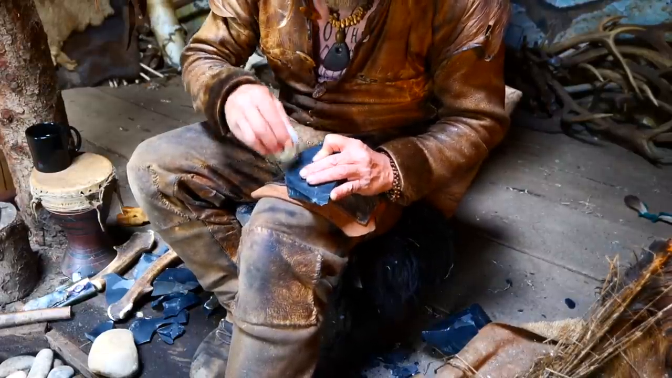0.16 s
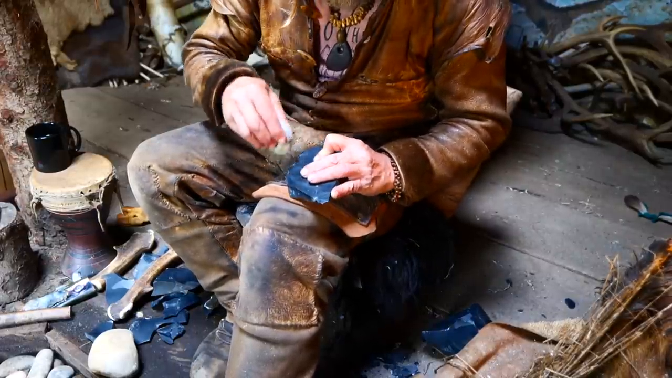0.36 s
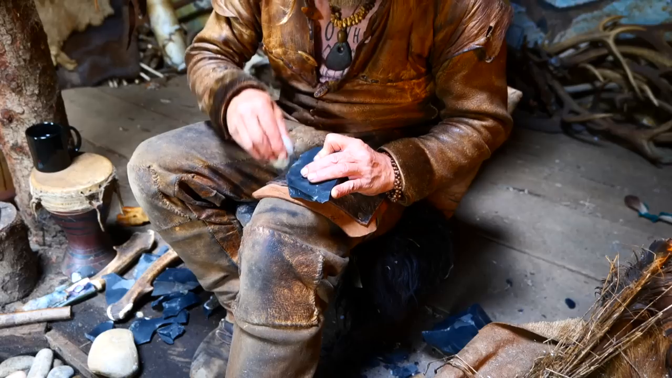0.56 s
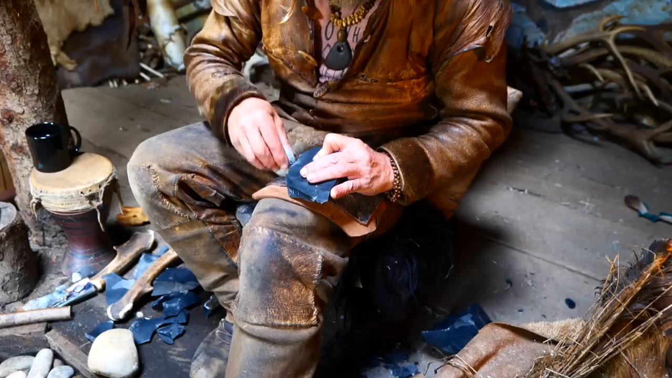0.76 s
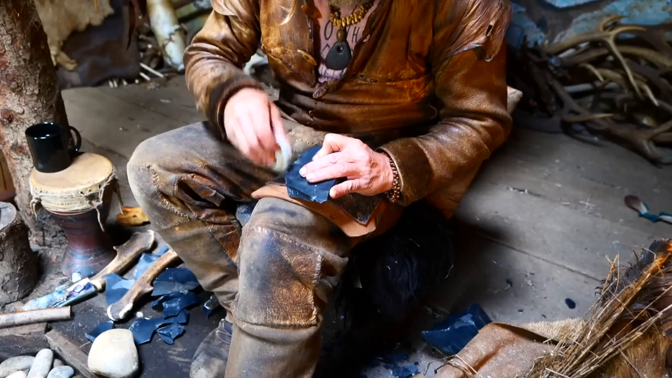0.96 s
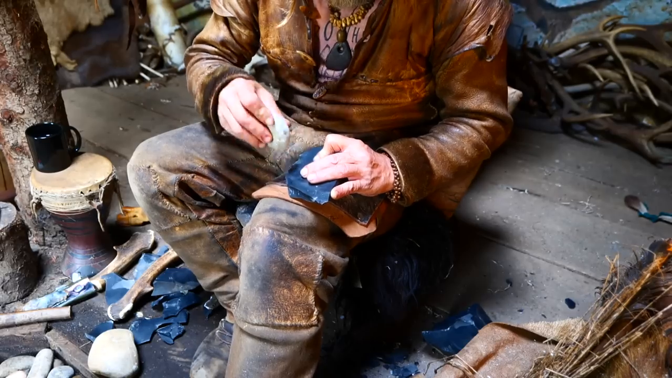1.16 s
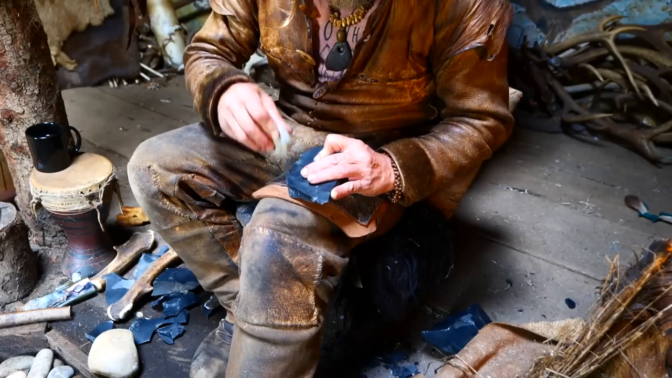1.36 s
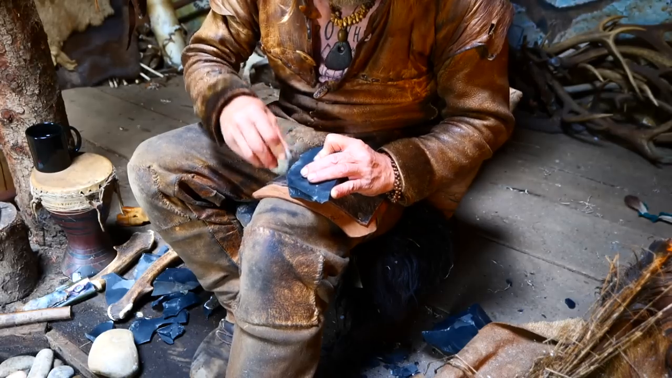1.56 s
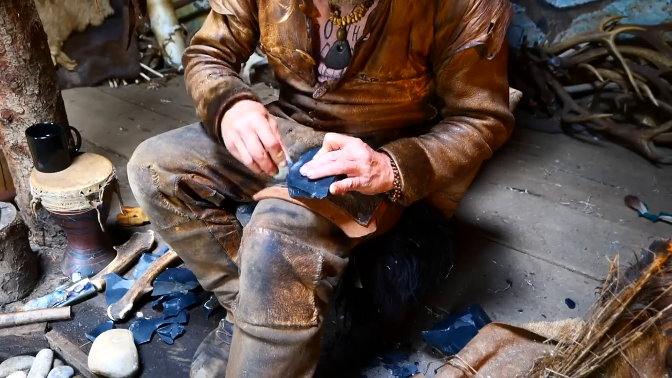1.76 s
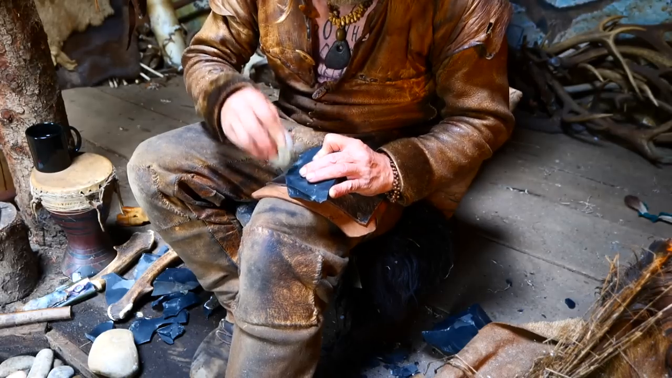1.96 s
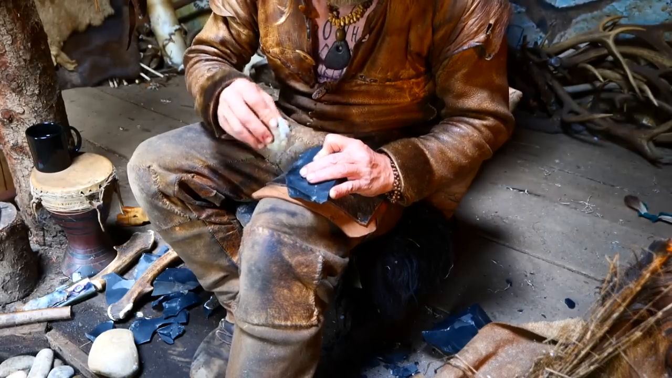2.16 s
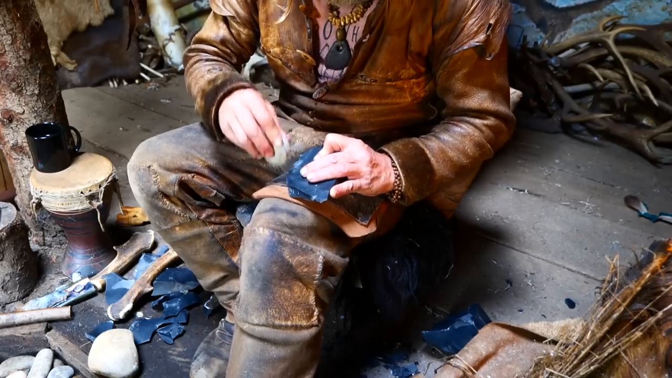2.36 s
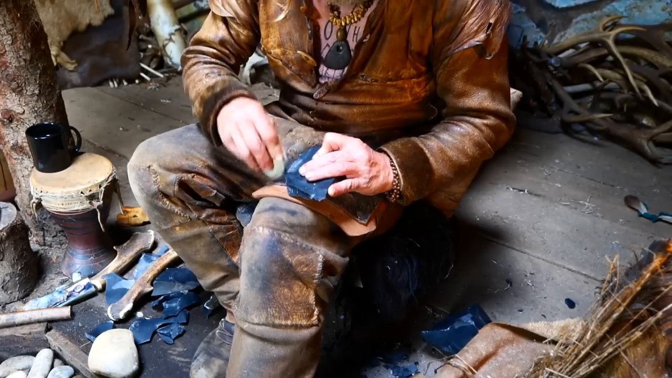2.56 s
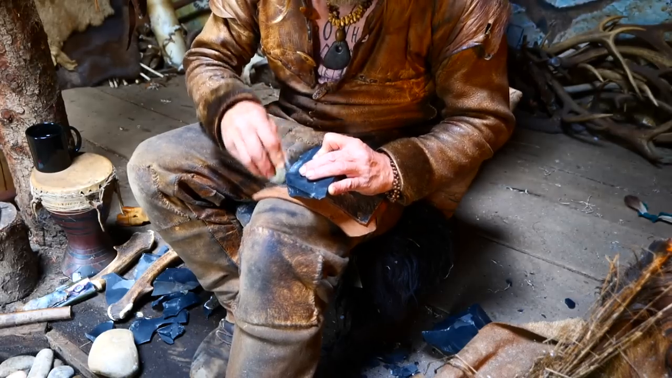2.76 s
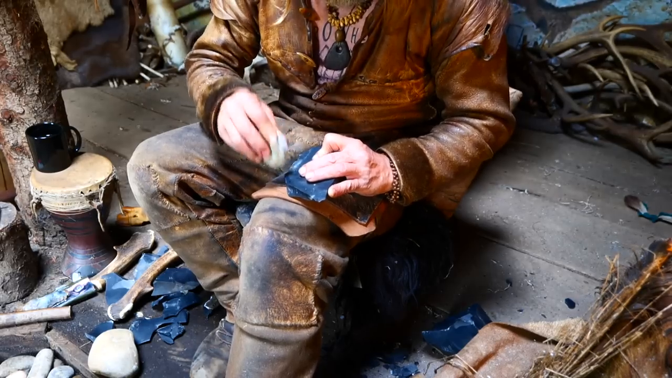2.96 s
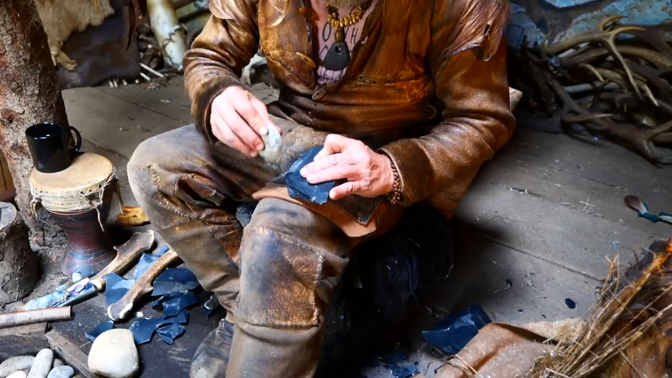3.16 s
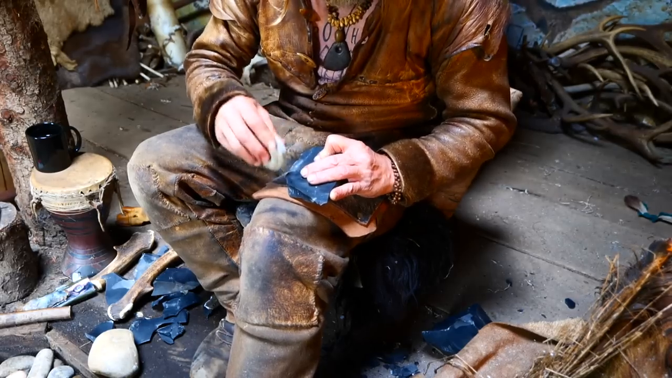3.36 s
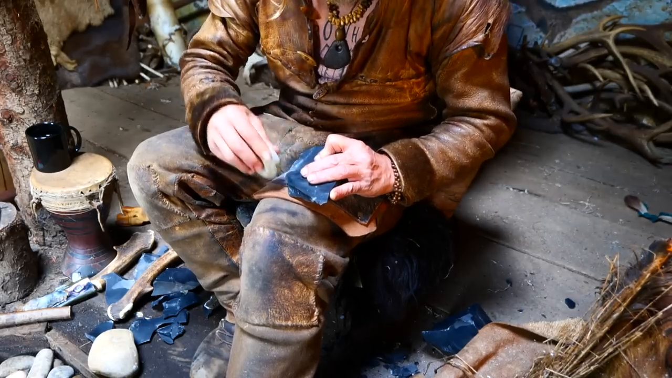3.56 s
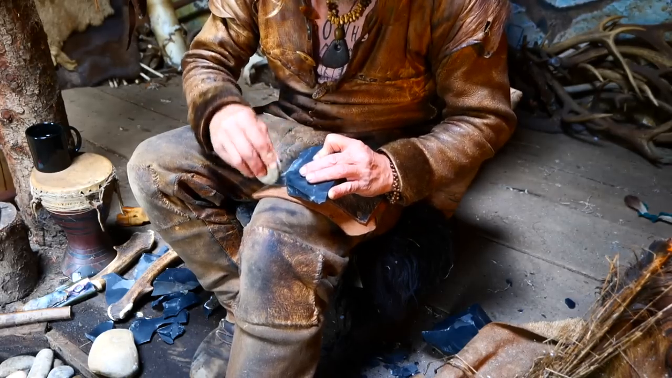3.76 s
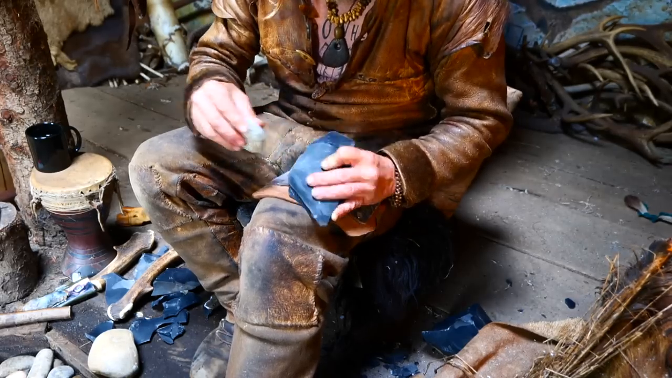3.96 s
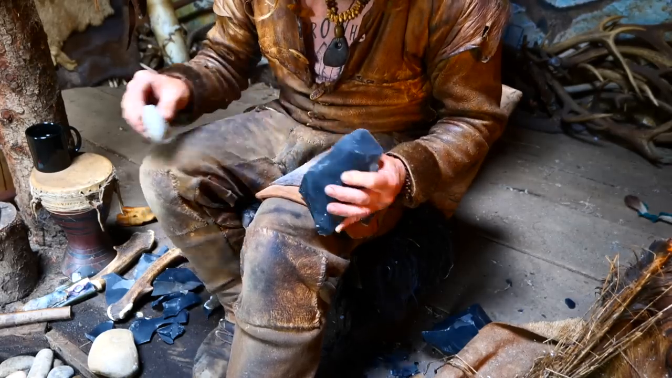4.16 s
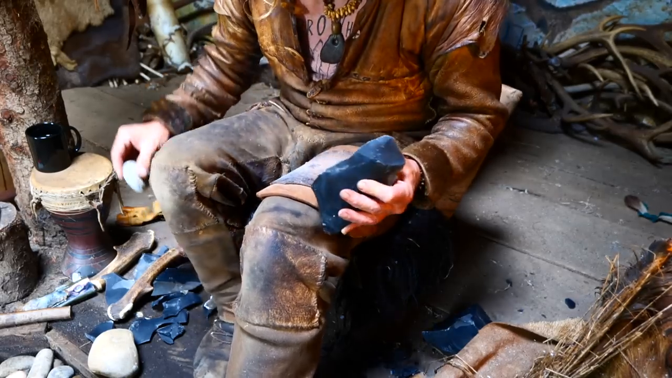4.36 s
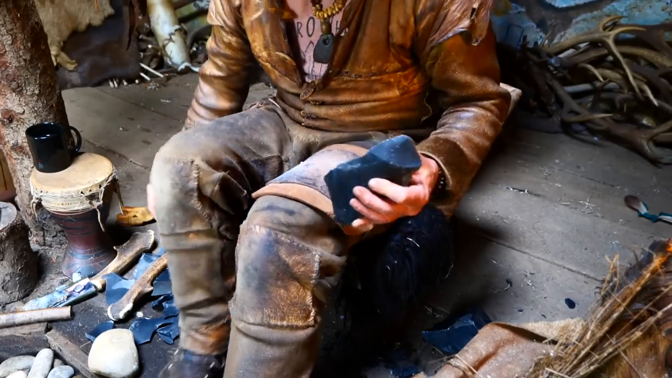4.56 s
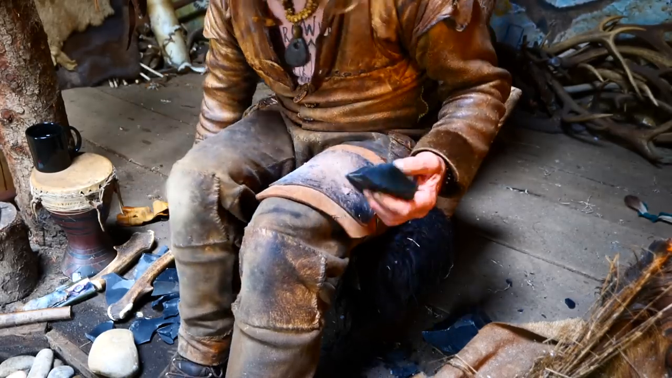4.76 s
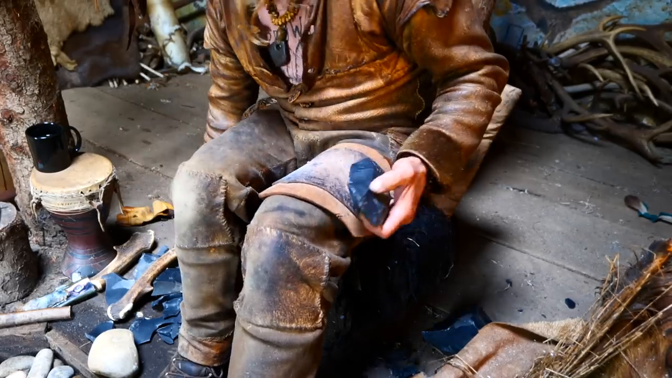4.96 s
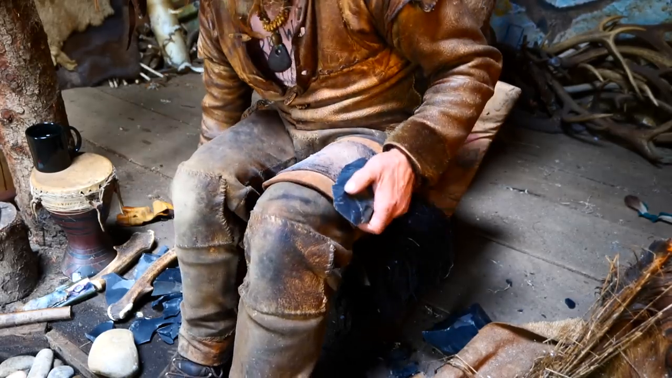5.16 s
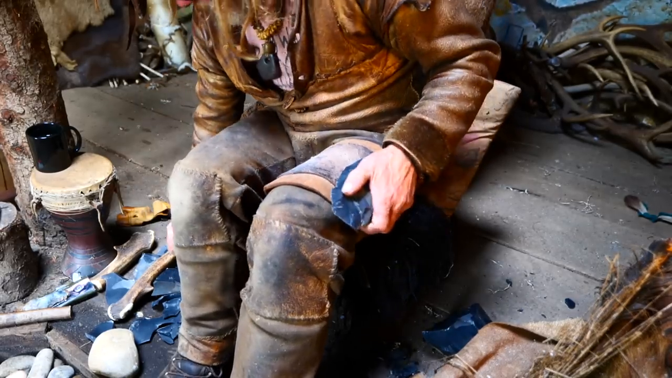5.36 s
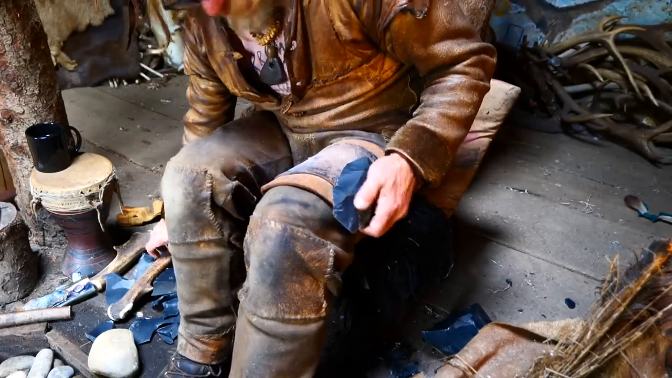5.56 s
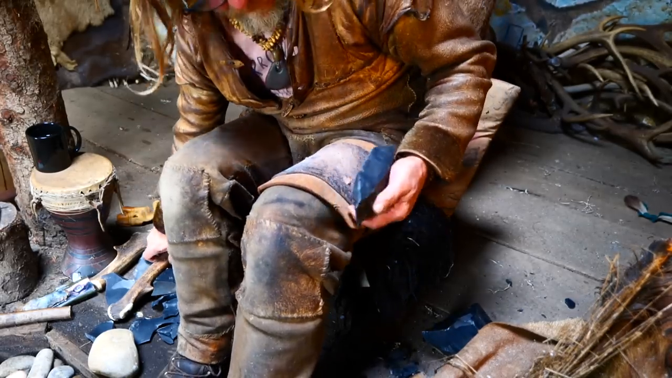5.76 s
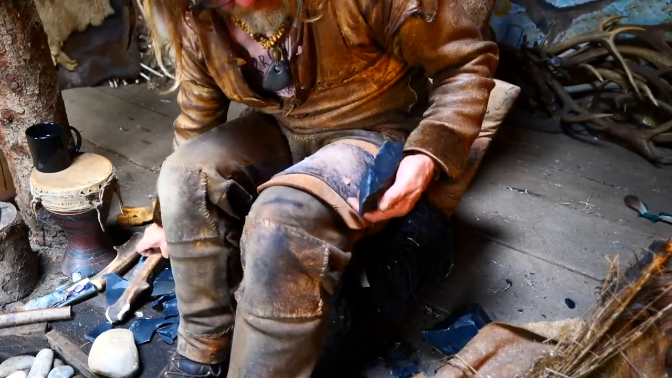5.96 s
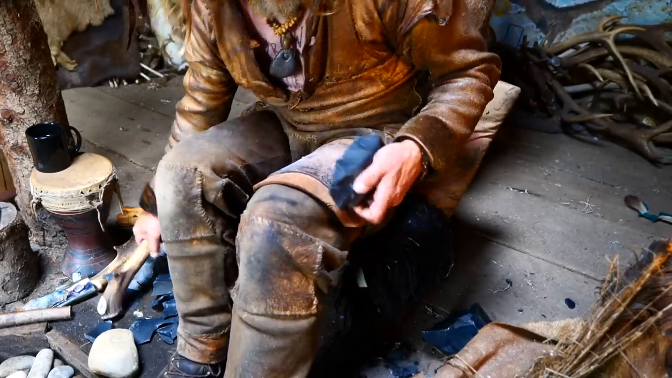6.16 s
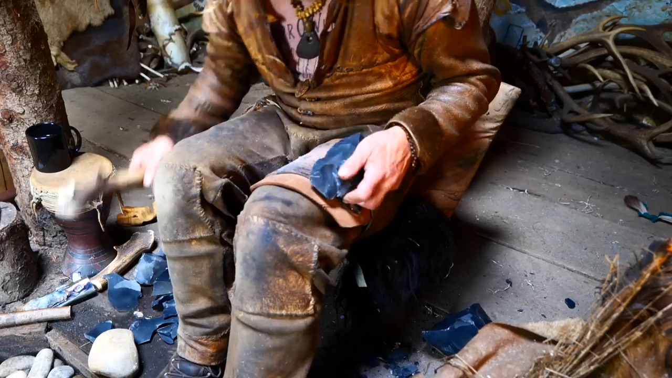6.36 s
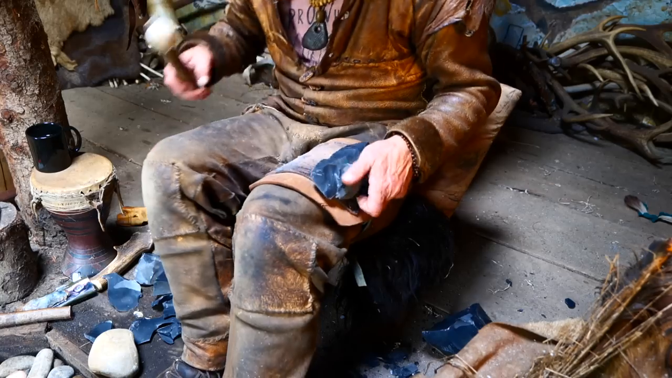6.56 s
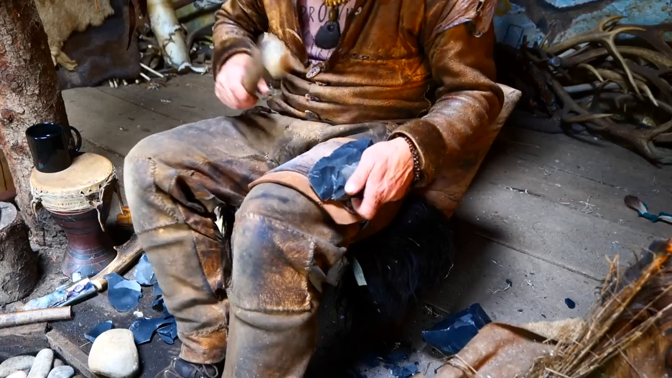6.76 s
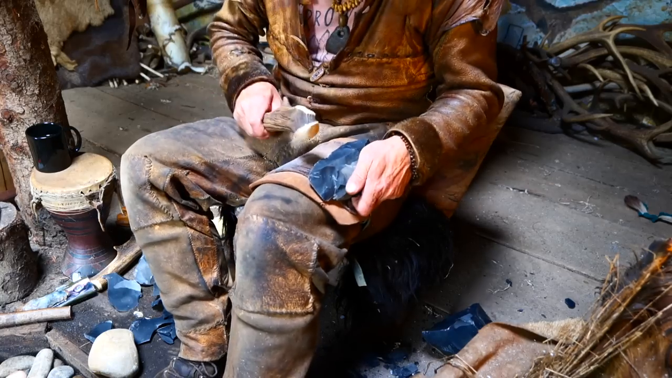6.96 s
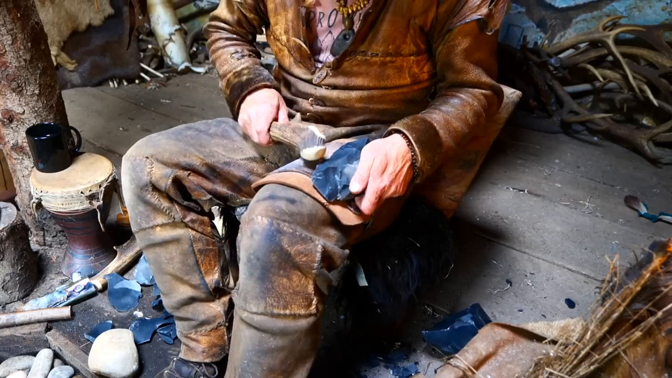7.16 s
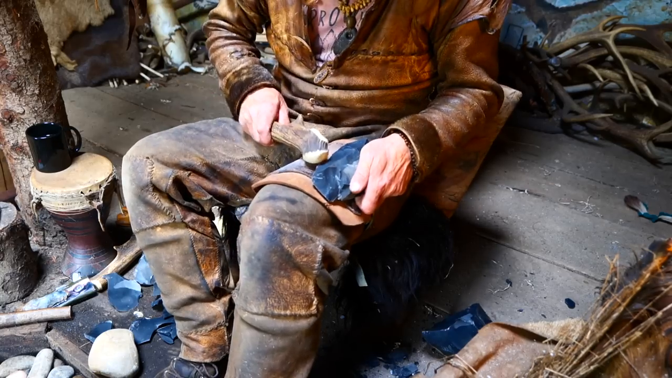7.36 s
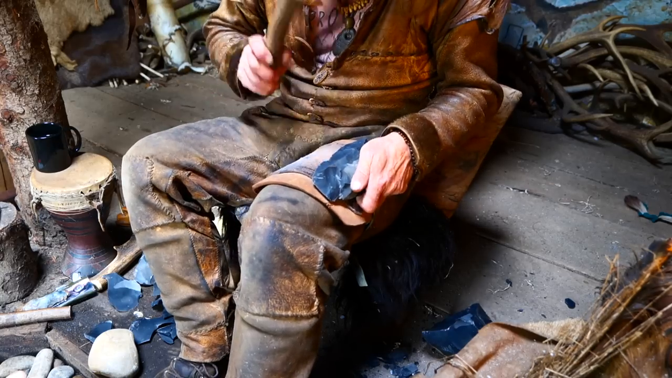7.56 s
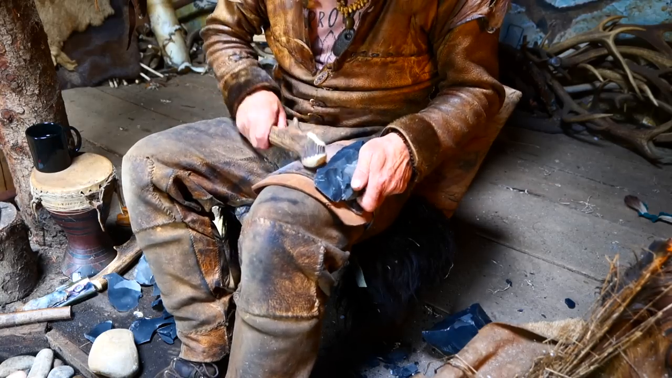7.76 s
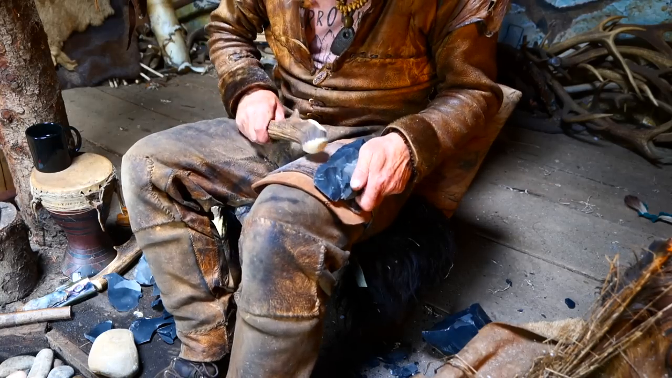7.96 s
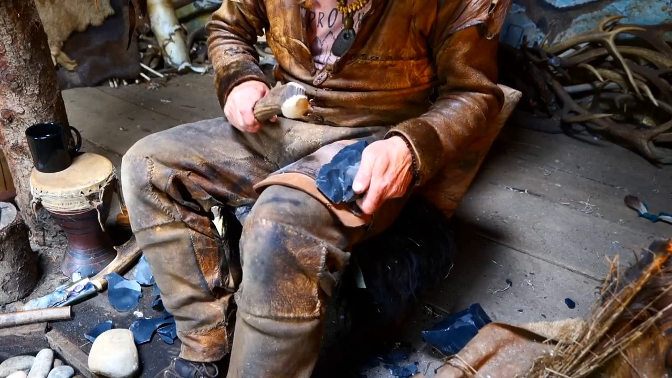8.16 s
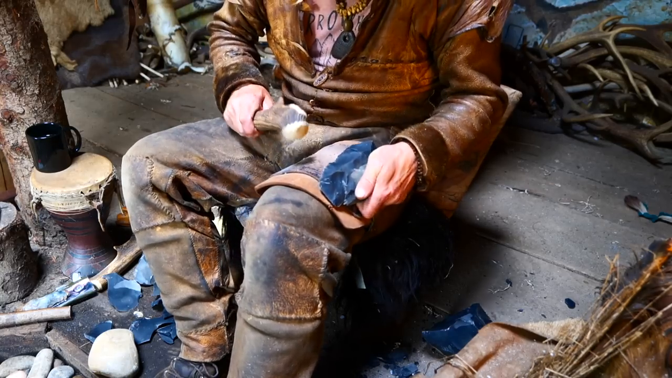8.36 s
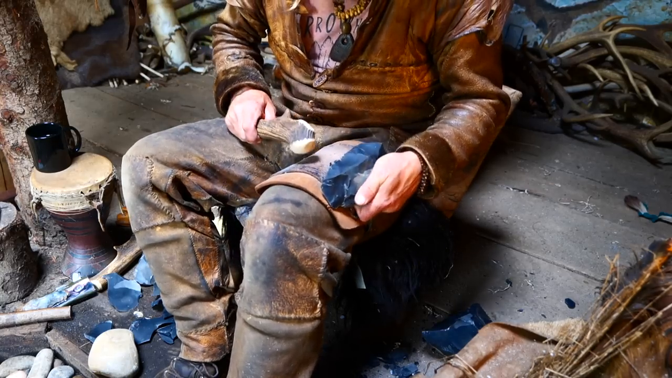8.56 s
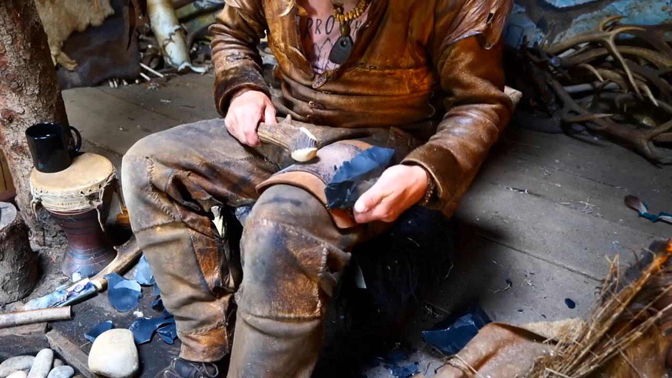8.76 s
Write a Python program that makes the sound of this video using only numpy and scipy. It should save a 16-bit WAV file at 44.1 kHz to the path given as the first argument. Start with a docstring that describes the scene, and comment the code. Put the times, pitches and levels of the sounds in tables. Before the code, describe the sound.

Close, dry indoor sound of stone working. A hammerstone taps a hand-damped flint core about four times a second, each tap a short bright clack with crushed grit and a soft pad thump. Leather rustles. After a pause, objects knock and clatter loudly on a wooden floor, flakes clink, then a solid tap and a violent crack with splinters, leaving faint grit and rustle.

```python
"""In a hut that hums softly, leather rustles while a hammerstone trims a flint core on a knee pad.
Taps ring damped core and stone modes over crushed-edge noise; noise grains tick as grit; thin tones whistle.
The stone is put down; a hand rummages among wood, antler and flakes: decaying rings, noise burrs, one scrape.
An antler billet then strikes a flake off: three core modes, a bright snap and a spray of splinter noise.
Struck sounds also excite the hut's diffuse decay; rustle and hum run to the end."""
import sys
import numpy as np
from scipy import signal
from scipy.fft import rfft, irfft
from scipy.io import wavfile

SR = 44100
rng = np.random.default_rng(int(sys.argv[2]) if len(sys.argv) > 2 else 0)


def store_pcm(level_fs):
    """Save levels as 16-bit WAV."""
    pcm = np.round(np.clip(level_fs, -1, 1) * 32767).astype(np.int16)
    wavfile.write(sys.argv[1], SR, np.atleast_2d(pcm).T)


N = 387638

# Leather and sleeve movement, interpolated: [t/s, creak level/dB, swish level/dB]
RUSTLE_LEVELS = [(0.0, -54, -73), (0.64, -62, -77), (1.15, -51, -71.5), (1.86, -61.5, -70.5),
                 (2.55, -57.5, -75), (2.79, -59.5, -66.5), (3.35, -60.5, -71.5), (3.74, -52, -77),
                 (4.06, -51, -64), (5.04, -55, -65), (5.24, -50.5, -60.5), (5.43, -57.5, -69),
                 (5.97, -54, -59), (6.09, -50, -54), (6.19, -54, -63), (6.66, -49.5, -63),
                 (7.37, -59, -73.5), (7.81, -56.5, -64.5), (7.91, -60, -76), (8.79, -58, -64)]
SHUFFLE_RE_CREAK_DB = 0.5
SHARED_WAVER_DB, OWN_WAVER_DB, WAVERS_PER_S = 0.84, 1.14, 7

# Hum spectrum shape: [f/Hz, density/dB]
HUM_SPECTRUM = [(15, -45), (25, 15.5), (84, 17), (185, -3.5), (344, -0.5), (887, -10.5), (1160, 4.5),
                (1290, -4.5), (1890, -37.5), (3520, -4), (5730, -42.5), (12900, -21), (16000, -36)]
HUM_DB = -54.5

# Hard contacts: [t/s, level/dB, f/Hz, burr t60/s]
CLACKS = [(0.079, -37, 1350, 0.032), (.108, -46, 1190, 0.021), (.134, -39, 1110, 0.022),
          (.176, -42, 1090, .03), (4.377, -33, 1160, 0.029), (4.632, -19, 1600, 0.023),
          (5.359, 1, 770, 0.037), (5.599, -33.5, 1640, 0.06), (5.6948, -13, 1510, 0.045),
          (5.696, -20.5, 2680, 0.017), (5.71, -23, 1780, 0.14), (5.998, -31.5, 1780, 0.063),
          (6.135, -8, 3030, 0.033), (6.1362, -20, 1836, 0.12), (6.154, -17.5, 2850, 0.036),
          (6.169, -23.5, 2400, 0.046), (6.2097, -11.5, 800, 0.039), (6.62, -30.5, 1180, 0.047),
          (7.2535, -5.5, 1160, .02), (7.262, -31.5, 1550, 0.16), (7.2535, -29.5, 3380, 0.025),
          (7.7289, -22.5, 2460, 0.024)]

# Hammerstone taps: [t/s, crunch level/dB, grit level/dB, low thump delay/s, thump level/dB]
TAPS = [(0.2297, -12, -23.5, .025, -14.5), (0.5102, -15, -22, .024, -11.5), (0.7617, -22, -27, .027, -12),
        (1.0174, -18, -22, .026, -12.5), (1.269, -10, -20, .024, -9.5), (1.5290, -17, -25.5, .022, -10.5),
        (1.781, -12.5, -19.5, .026, -12.5), (2.0299, -11.5, -17, .014, -9),
        (2.2784, -17.5, -27.5, .025, -16.5), (2.533, -8.5, -15.5, .015, -9.5),
        (2.7926, -10.5, -13, .016, -8.5), (3.04, -20, -30, .014, -12), (3.2805, -14, -21, .013, -12),
        (3.5052, -25.5, -35, .0072, -11), (3.7281, -19, -24.5, .011, -8.5)]
# Taps and rebounds along the edge: [t/s, level/dB, most excited f/Hz]
EDGE_CONTACTS = [(0.2302, -9.5, 2020), (0.2352, -15, 2080), (0.2535, -8.5, 2320), (0.51, -12, 2140),
                 (0.5162, -10, 1740), (0.5227, -14.5, 2060), (0.529, -23, 1790), (0.7614, 0, 1850),
                 (0.766, -13, 1780), (0.77, -17, 1870), (1.0182, -13.5, 2140), (1.033, -8, 1940),
                 (1.2707, -5, 1960), (1.279, -1.5, 2000), (1.5284, -5.5, 2000), (1.534, -4.5, 1990),
                 (1.7802, 1, 1950), (1.7859, -4, 1980), (1.7929, -10.5, 2440), (2.0307, -6, 2580),
                 (2.034, -8, 2700), (2.0426, -4, 1980), (2.0481, -16, 2600), (2.075, -20, 1590),
                 (2.278, 5.5, 1860), (2.2873, -14, 1720.0), (2.5333, -8, 2500), (2.543, -7, 2320),
                 (2.7939, -4.5, 2820), (2.7977, -12.5, 2700), (2.8015, -7, 1950.0), (3.0399, 4.5, 1770),
                 (3.28, 1, 2400), (3.2916, -0.5, 1530), (3.5061, -0.5, 1870), (3.5425, -7, 1440),
                 (3.7284, -1, 2040), (3.7368, -4.5, 1410), (3.7472, -8, 1550)]
# Modes of the hand-damped core: [f/Hz, level/dB, t60/s]
CORE_MODES = [(1009, -0.5, 0.02), (1426, -12, 0.018), (1743, -3.5, 0.011), (2039, -2, 0.013),
              (2726, -7.5, 0.01), (3270, 1, 0.0073), (3714, 1.5, 0.015)]
# Modes of the hammerstone: [f/Hz, level/dB, t60/s]
STONE_MODES = [(7050, -10, .12), (7100, -11, .10), (10010, -10, .06), (10060, -10, .09), (12840, -3, .05),
               (12885, -6, .085), (13780, -17, .06), (15630, -7, .05), (15720, -9, .045)]
# Stone touching the floor: [t/s, ring level/dB]
STONE_NUDGES = [(4.57, -57), (4.659, -50)]
# Crushed-edge spectrum shape: [f/Hz, density/dB]
CRUNCH_SPECTRUM = [(240, -61), (400, -18.5), (1220, -7), (2090, -2), (5690, -21.5), (6950, -23),
                   (11200, -17), (12500, -24.5), (16000, -15.5)]
USUAL_CRUNCH_DB, USUAL_CRUNCH_T60_S = -15.5, 0.085
T60_HALVING_DB = 13.5  # louder crunches are shorter
USUAL_STONE_RING_DB, RING_DB_PER_CRUNCH_DB = -20, 0.64

# Clearest grit grains: [t/s, level 1.4-5.1 kHz/dB, level 4.9-12 kHz/dB]
GRIT_TICKS = [(.311, -31, -42), (.33, -32.5, -53), (.435, -45, -56), (.6994, -49, -71), (1.1477, -60, -39),
              (1.3823, -29, -50), (2.0184, -30, -47), (2.1817, -53, -32), (2.2671, -28, -31.5),
              (2.3895, -30, -40), (2.4714, -41, -43), (2.5, -28, -47), (2.617, -25, -39),
              (2.684, -35, -43.5), (2.8837, -29, -45.5), (2.9197, -29.5, -41), (3.443, -59, -43),
              (3.69, -51, -39.5), (3.9744, -55, -42), (5.0185, -64, -39), (5.2839, -28, -26),
              (6.107, -37, -28), (6.5052, -46, -32), (6.5222, -25.5, -38), (7.5265, -36.5, -50),
              (7.5517, -41, -58.5), (7.5956, -31, -46), (7.867, -42.5, -36), (7.9054, -57, -44),
              (7.9304, -46.5, -47), (8.1128, -47, -48), (8.1446, -47, -43), (8.1266, -35, -38),
              (8.2452, -62, -40), (8.256, -50, -32), (8.351, -52.5, -35.5), (8.3555, -31.5, -50),
              (8.734, -35.5, -49)]
# Fainter grains fall at random
FINE_GRIT_COUNT = 40
FINE_GRIT_MEAN_DB, FINE_GRIT_SPREAD_DB = [-58.5, -46], 5.5  # low band, high band

# Thin whistles: [start/s, end/s, start f/Hz, end f/Hz, level/dB]
CHIRPS = [(.92, 1.02, 4150, 4490, -58), (1.19, 1.25, 4420, 4250, -57), (2.29, 2.44, 6830, 6830, -57),
          (2.55, 2.70, 6830, 6830, -55), (2.70, 2.80, 6830, 6830, -60), (3.89, 3.99, 4400, 4000, -61),
          (4.0, 4.135, 4030, 4180, -54)]

# Moves of sleeve, hand and feet:
# [t/s, half length/s, level 100-526 Hz/dB, level 0.5-3.4 kHz/dB, level 5-16 kHz/dB]
SWISHES = [(2.362, 0.063, -44, -50.5, -71), (2.61, 0.037, -51, -45.5, -75), (2.863, .04, -52, -46, -65),
           (4.15, 0.052, -48.5, -46.5, -56), (4.45, 0.026, -53, -50, -66), (4.745, 0.11, -44, -50.5, -57),
           (5.152, 0.044, -35, -42.5, -51.5), (5.265, .03, -62, -62, -49), (5.53, 0.038, -43.5, -73, -68),
           (5.994, 0.05, -32.5, -47.5, -71), (6.154, 0.031, -30.5, -47, -51),
           (6.232, 0.073, -32.5, -51.5, -65), (6.473, 0.052, -47, -42.5, -49),
           (6.578, 0.054, -47.5, -48.5, -51), (6.831, 0.029, -53, -43.5, -48.5),
           (7.212, .0081, -53, -54, -60), (8.262, 0.019, -50, -49, -57), (8.752, 0.044, -66, -55.5, -58.5)]

# Single chips: [t/s, level/dB, f/Hz, t60/s]
PINGS = [(2.92, -37, 6780, .12), (3.234, -44, 14000, .06), (3.242, -40.5, 12940, .07),
         (6.108, -26, 7240, .0083), (6.135, -29, 7700, 0.026), (6.37, -30, 7070, 0.027),
         (6.3694, -41, 12700, .03), (6.428, -39.5, 7150, .05), (7.5956, -50.5, 6930, .083)]

# Dull knocks of wood, antler and feet: [t/s, level/dB, f/Hz, t60/s]
KNOCKS = [(4.426, -28, 153, 0.029), (4.632, -16.5, 173, .03), (4.644, -12, 131, 0.048),
          (4.661, -22, 400, 0.06), (4.713, -27, 110, 0.031), (5.3583, 8, 251, .024),
          (5.372, -3, 313, 0.022), (5.416, -13, 189, 0.083), (5.5978, -0.5, 275, 0.0091),
          (5.696, -8.5, 163, 0.021), (5.737, -15, 163, 0.066), (5.984, -12.5, 200, .019),
          (5.997, -18, 230, 0.039), (6.054, -12.5, 194, 0.043), (6.067, -13.5, 216, 0.034),
          (6.135, -16.5, 438.5, .096), (6.2094, -5, 467, 0.039), (6.223, -9, 503, 0.062),
          (6.598, -17.5, 604, 0.017), (6.914, -31, 354, 0.032), (7.038, -36.5, 360, .03),
          (7.2535, -7, 458, 0.012), (7.707, -18.5, 360, 0.018), (7.717, -15, 395, 0.018),
          (7.7304, -12.5, 474, 0.018), (7.734, -8.5, 343, 0.021)]
# Floor modes underfoot: [f/Hz, level/dB, t60/s]
FLOOR_MODES = [(180.3, -0.5, 0.31), (226.5, -2, .17), (350, -4, .15)]
RUMBLE_DB, FLOOR_RING_DB = -16, -28.5  # relative to a 250 Hz knock
SHAKE_DB_PER_OCTAVE = -3  # higher knocks shake the floor less
ON_LAP_FROM_S, LAP_LOSS_DB = 7.2, 11  # knocks on the lap hardly reach the floor

# A thick shard jumping twice: [t/s, level/dB]
SHARD_HITS = [(5.359, -31.5), (5.382, -29.5)]
# Modes of the shard: [f/Hz, level/dB, t60/s]
SHARD_MODES = [(4120, -1, .07), (4240, 1.5, 0.052), (4430, -8, .06), (6400, -13, 0.046), (8750, -18, .07),
               (8870, -19.5, .07), (12840, -19, .09)]

# Stick dragged across another: [start/s, length/s, level/dB]
SCRAPE = (5.893, .048, -43)
# Stick resonances: [f/Hz, width/Hz, level/dB]
STICK_MODES = [(1200, 180, 0), (3150, 600, -2)]

# Flakes clinking together: [t/s, level/dB]
CLINKS = [(5.9369, -24.5), (5.9444, -41), (5.971, -40), (5.9844, -46), (6.0185, -33), (6.0556, -48),
          (6.0646, -42), (6.179, -41.5), (6.1944, -44), (6.2183, -46.5)]
# Modes of a flake: [f/Hz, level/dB, t60/s]
FLAKE_MODES = [(6760, -2.5, 0.042), (9160, -6, .08), (10480, -15, 0.049), (11850, -21, 0.13),
               (13300, -5, .05), (15100, -4, 0.04)]

# Splinter spectrum shape: [f/Hz, density/dB]
SHATTER_SPECTRUM = [(180, -41.5), (300, -6.5), (337, -10.5), (656, -19.5), (1580, -3), (2140, -4.5),
                    (3130, 1.5), (12100, -36), (16000, -55)]
STRIKE_S, STRIKE_DB = 7.7414, 5
SHATTER_DB, SHATTER_T60_S = -14.5, 0.22

# Decay of the hut: [f/Hz, t60/s]
HUT_DECAY = [(100, 0.66), (260, .3), (700, 0.21), (1800, 0.13), (5000, 0.25), (13000, 0.18)]
HUT_DB = -12  # tail energy relative to direct sound
STRUCK_LOW_CUT_HZ = 78.5
TOP_STOP_HZ = 16400


def amp(db):
    """dB to gain."""
    return 10 ** (np.asarray(db) / 20)


def rms_one(x):
    """Scale to unit rms."""
    return x / np.sqrt(np.mean(x ** 2) + 1e-20)


def at_hz(points, hz):
    """Interpolate a table on a log-frequency axis."""
    table_hz, values = np.array(points).T
    return np.interp(np.log(hz), np.log(table_hz), values)


def band(x, low_hz, high_hz):
    """Band-pass."""
    edges_hz = [low_hz, min(high_hz, .45 * SR)]
    return signal.sosfilt(signal.butter(2, edges_hz, "band", fs=SR, output="sos"), x)


def high_pass(x, hz):
    """Take out the bass."""
    return signal.sosfilt(signal.butter(2, hz, "high", fs=SR, output="sos"), x)


def grainy(spread_db):
    """White noise whose loudness jumps every 64 samples."""
    jumps = np.repeat(rng.exponential(1, N // 64 + 1), 64)[:N]
    return rng.standard_normal(N) * amp(spread_db * np.minimum(jumps, 4))


def coloured(spectrum, spread_db):
    """Grainy noise of the given spectrum shape, rms 1."""
    hz = np.maximum(np.arange(N // 2 + 1) * SR / N, 1)
    shaped = rfft(grainy(spread_db)) * amp(at_hz(spectrum, hz))
    return rms_one(irfft(shaped, N))


def waver(per_s):
    """Slow drift: unit-spread random values joined by straight lines."""
    steps = np.arange(N) / SR * per_s
    return np.interp(steps, np.arange(200), rng.standard_normal(200))


def add(out, s, sound):
    """Mix a sound in at time s."""
    i = round(s * SR)
    out[i:i + len(sound)] += sound[:N - i]


def ring(hz, level_db, t60_s):
    """One exponentially decaying mode."""
    t = np.arange(int(t60_s * SR) + 2) / SR
    return amp(level_db - 60 * t / t60_s) * np.sin(2 * np.pi * hz * t)


def fade(level_db, t60_s, rise_s):
    """Envelope that swells quickly and dies exponentially."""
    t = np.arange(int(t60_s * SR) + 2) / SR
    return amp(level_db - 60 * t / t60_s) * (1 - np.exp(-t / rise_s))


def strike(events, modes, spread_db):
    """Every blow rings every mode with a strength of its own."""
    out = np.zeros(N)
    chance_db = rng.normal(0, spread_db, (len(events), len(modes)))
    for (s, db), row in zip(events, chance_db):
        for (hz, mode_db, t60_s), extra_db in zip(modes, row):
            add(out, s, ring(hz, db + mode_db + extra_db, t60_s))
    return out


def rustle():
    """Leather, sleeve and feet moving: grainy, uneven noise in three bands."""
    s, creak_db, swish_db = np.transpose(RUSTLE_LEVELS)
    levels_db = [creak_db + SHUFFLE_RE_CREAK_DB, creak_db, swish_db]
    bands_hz = [(100, 480), (600, 3220), (5000, 14000)]
    t, out, shared = np.arange(N) / SR, np.zeros(N), waver(WAVERS_PER_S)
    for db, (low_hz, high_hz) in zip(levels_db, bands_hz):
        uneven_db = SHARED_WAVER_DB * shared + OWN_WAVER_DB * waver(WAVERS_PER_S)
        noise = rms_one(band(grainy(spread_db=2.5), low_hz, high_hz))
        out += amp(np.interp(t, s, db) + uneven_db) * noise
    return out


def hum():
    """Steady coloured noise of the hut."""
    return amp(HUM_DB) * coloured(HUM_SPECTRUM, spread_db=2)


def clacks():
    """Hard contacts: a sharp ring and a longer burr of noise around its pitch."""
    out = np.zeros(N)
    for s, db, hz, burr_t60_s in CLACKS:
        add(out, s, band(ring(hz, db - 0.5, burr_t60_s / 3), hz / 3, hz * 3))
        burr = fade(db - 8.5, burr_t60_s, 0.00048)
        noise = band(rng.standard_normal(9000), hz / 2.14, hz * 1.6)
        noise = rms_one(band(noise, hz / 2.16, hz * 1.6))
        add(out, s, burr * noise[-len(burr):])  # skips the filter onset
    return out


def core():
    """Each contact favours core modes near its own pitch; a small stone sends out no bass."""
    out = np.zeros(N)
    chance_db = rng.normal(0, 3, (len(EDGE_CONTACTS), len(CORE_MODES)))
    for (s, db, centre_hz), row in zip(EDGE_CONTACTS, chance_db):
        for (hz, mode_db, t60_s), extra_db in zip(CORE_MODES, row):
            off_pitch_db = -22 * np.log2(hz / centre_hz) ** 2
            add(out, s - .0004, ring(hz, db + mode_db + extra_db + off_pitch_db, t60_s))
    return band(band(out, 700, 4500), 700, 4500)


def stone():
    """Hammerstone modes, louder with the crunch, and its touches on the floor."""
    blows = []
    for s, crunch_db, *_ in TAPS:
        swing_db = RING_DB_PER_CRUNCH_DB * (crunch_db - USUAL_CRUNCH_DB)
        blows.append((s, USUAL_STONE_RING_DB + swing_db))
    return strike(blows + STONE_NUDGES, STONE_MODES, spread_db=4.5)


def crushed_edge():
    """Fracturing edge: broadband crunch noise plus grit noise at 3.1-4.3 kHz."""
    crunch, grit = np.zeros((2, N))
    for s, crunch_db, grit_db, *_ in TAPS:
        t60_s = USUAL_CRUNCH_T60_S * 2 ** ((USUAL_CRUNCH_DB - crunch_db) / T60_HALVING_DB)
        add(crunch, s, fade(crunch_db, t60_s, 0.00067))
        add(grit, s, fade(grit_db, t60_s=0.0016 * 0 + t60_s, rise_s=0.0016))
    grit_noise = rms_one(band(grainy(spread_db=4.5), 3100, 4300))
    return crunch * coloured(CRUNCH_SPECTRUM, spread_db=4.0) + grit * grit_noise


def pad_thumps():
    """Core dropping back on pad and thigh: two low modes over shaken-leather noise."""
    thump, leather = np.zeros((2, N))
    for s, _, _, delay_s, thump_db in TAPS:
        add(thump, s + delay_s - .002, ring(289, thump_db, 0.016))
        add(thump, s + delay_s, ring(85, thump_db - 19, 0.22))
        add(leather, s, fade(thump_db - 12.0, 0.13, 0.0018))  # shakes from the first touch on
    leather_noise = rms_one(band(rng.standard_normal(N), 150, 760))
    return band(thump, 74, 970) + leather * leather_noise


def grit_ticks():
    """Grains on pad and floor: very short noise bursts in two bands."""
    out = np.zeros(N)
    decay = amp(-60 * np.arange(400) / SR / 0.0047)  # t60 4.7 ms
    fine_s = rng.random(FINE_GRIT_COUNT) * N / SR
    fine_db = FINE_GRIT_MEAN_DB + FINE_GRIT_SPREAD_DB * rng.standard_normal((FINE_GRIT_COUNT, 2))
    for s, low_db, high_db in np.vstack([GRIT_TICKS, np.c_[fine_s, fine_db]]):
        grain = rng.standard_normal(400)
        add(out, s, amp(low_db) * rms_one(band(grain, 1400, 5100)) * decay)
        add(out, s, amp(high_db) * rms_one(band(grain, 4900, 12000)) * decay)
    return out


def chirps():
    """Thin sine whistles, steady or gliding."""
    out = np.zeros(N)
    for start_s, end_s, start_hz, end_hz, db in CHIRPS:
        hz = np.linspace(start_hz, end_hz, int((end_s - start_s) * SR))
        swell = np.sqrt(np.hanning(len(hz)))
        add(out, start_s, amp(db) * swell * np.sin(2 * np.pi * np.cumsum(hz) / SR))
    return out


def swishes():
    """Short swells of cloth noise and of shuffling on the floor, in three bands."""
    t, swells = np.arange(N) / SR, np.zeros((3, N))
    for s, half_s, *levels_db in SWISHES:
        swells += amp(levels_db)[:, None] * np.exp(-np.abs((t - s) / half_s) ** 2.6)
    cloth, out = grainy(spread_db=3.0), np.zeros(N)
    for swell, (low_hz, high_hz) in zip(swells, [(100, 526), (500, 3400), (5000, 16000)]):
        out += swell * rms_one(band(cloth, low_hz, high_hz))
    return out


def pings():
    """Single chips ring; a close second mode makes them beat."""
    out = np.zeros(N)
    for s, db, hz, t60_s in PINGS:
        add(out, s, ring(hz, db, t60_s) + ring(hz * 1.012, db - 12, t60_s))
    return out


def knocks():
    """A short low ring, then rumble noise and modes of the shaken floor."""
    out, rumble, shakes = np.zeros(N), np.zeros(N), []
    for s, db, hz, t60_s in KNOCKS:
        shake_db = db + SHAKE_DB_PER_OCTAVE * np.log2(hz / 250)
        if s > ON_LAP_FROM_S:
            shake_db -= LAP_LOSS_DB
        add(out, s, ring(hz, db, t60_s))
        add(rumble, s, fade(shake_db + RUMBLE_DB, 0.17, 0.0065))
        shakes.append((s, shake_db + FLOOR_RING_DB))
    out += strike(shakes, FLOOR_MODES, spread_db=3.5)
    rumble_noise = rms_one(band(rng.standard_normal(N), 120, 396))
    return band(out, 89.0, 1300) + rumble * rumble_noise


def shard():
    """A thick shard jumps twice, ringing the same modes alike."""
    return strike(SHARD_HITS, SHARD_MODES, spread_db=0.0)


def scrape():
    """Rough slips, as grainy noise, into two stick resonances."""
    out, (s, length_s, db) = np.zeros(N), SCRAPE
    slips = grainy(spread_db=0.5)[:int(length_s * SR)]
    for hz, width_hz, mode_db in STICK_MODES:
        resonance = band(slips, hz - width_hz / 2, hz + width_hz / 2)
        add(out, s, amp(db + mode_db) * rms_one(resonance))
    return out


def clinks():
    """Flakes clink together: high modes of randomly varied strength."""
    return strike(CLINKS, FLAKE_MODES, spread_db=5.0)


def billet():
    """One hard blow on the core; the flake shears off in a spray of splinters."""
    spray = np.zeros(N)
    add(spray, STRIKE_S, fade(SHATTER_DB + 20, .012, .0002))
    add(spray, STRIKE_S + 0.0089, fade(SHATTER_DB, SHATTER_T60_S, .0006))
    add(spray, STRIKE_S + 0.011, fade(SHATTER_DB + 4, 0.018, .0004))
    out = spray * coloured(SHATTER_SPECTRUM, spread_db=0.5)
    add(out, STRIKE_S, ring(1423, STRIKE_DB, .016))
    add(out, STRIKE_S, ring(720, STRIKE_DB - 11.5, 0.011))
    add(out, STRIKE_S, ring(1150, STRIKE_DB - 11, 0.026))
    snap = fade(STRIKE_DB - 12.0, .02, .0002)  # bright snap of the fracture
    snap_noise = rms_one(band(rng.standard_normal(4000), 5000, 14000))
    add(out, STRIKE_S, snap * snap_noise[:len(snap)])
    return out


def jolt():
    """The big blow gives the microphone one brief, one-sided low push."""
    out = np.zeros(N)
    add(out, STRIKE_S, fade(-3.5, 0.013, 0.0011))
    return out


def hut(x):
    """Direct sound, then diffuse noise dying at its own rate in each half-octave."""
    t = np.arange(SR // 2) / SR
    edges_hz = 60 * 2 ** np.arange(0, 8.6, .5)
    tail = np.zeros(len(t))
    for low_hz, high_hz in zip(edges_hz, edges_hz[1:]):
        t60_s = at_hz(HUT_DECAY, np.sqrt(low_hz * high_hz))
        tail += band(rng.standard_normal(len(t)), low_hz, high_hz) * amp(-60 * t / t60_s)
    tail *= 1 - np.exp(-t / 0.0038)
    response = amp(HUT_DB) * tail / np.sqrt(np.sum(tail ** 2))
    response[0] = 1  # direct sound
    return signal.fftconvolve(x, response)[:N]


def scene():
    """Everything struck or scraped sounds in the hut, over rustle, whistles and hum."""
    taps = core() + stone() + crushed_edge() + pad_thumps()
    rummage = clacks() + knocks() + shard() + scrape() + clinks()
    struck = taps + rummage + grit_ticks() + pings() + billet()
    steady = rustle() + hum() + chirps() + swishes()
    return (high_pass(hut(struck), STRUCK_LOW_CUT_HZ) + jolt() + steady)[None]


def record(dry):
    """The hardest blows overload and clip; the top is cut."""
    top_cut = signal.cheby2(16, 60, TOP_STOP_HZ, fs=SR, output="sos")
    return signal.sosfilt(top_cut, np.clip(dry, -1, 1))


dry = scene()
out = record(dry)
store_pcm(out)
```